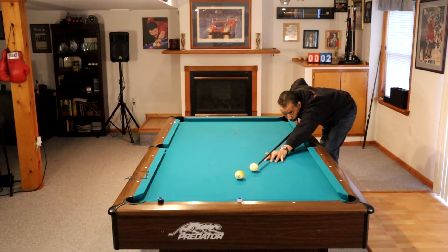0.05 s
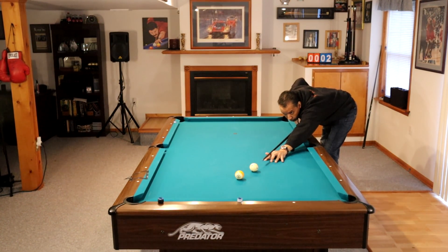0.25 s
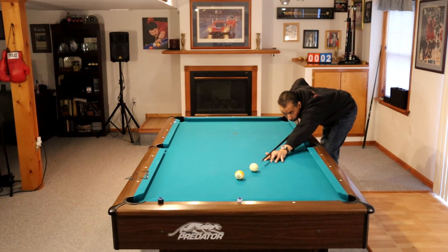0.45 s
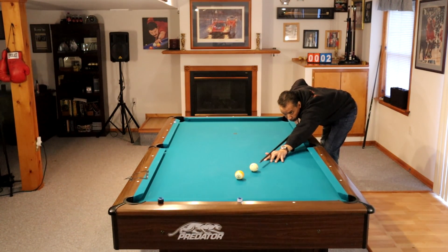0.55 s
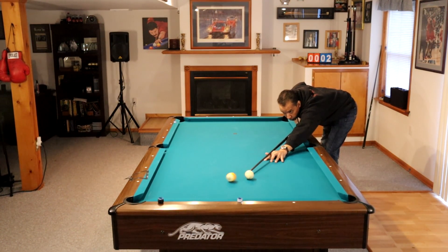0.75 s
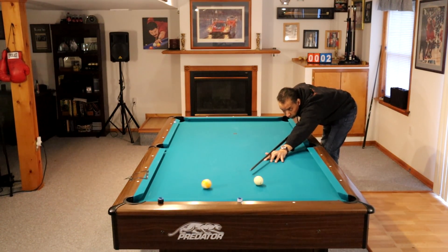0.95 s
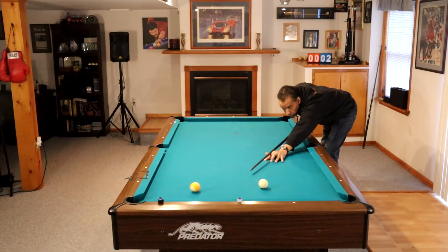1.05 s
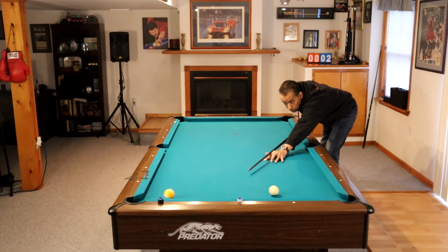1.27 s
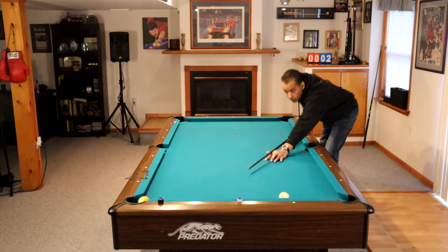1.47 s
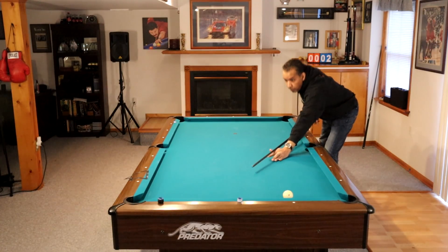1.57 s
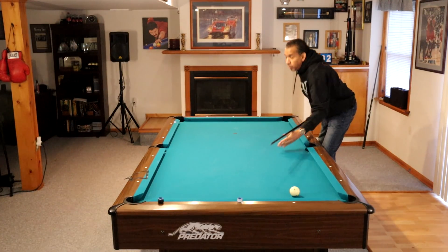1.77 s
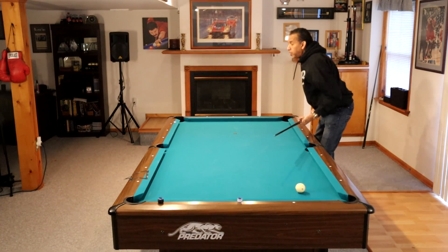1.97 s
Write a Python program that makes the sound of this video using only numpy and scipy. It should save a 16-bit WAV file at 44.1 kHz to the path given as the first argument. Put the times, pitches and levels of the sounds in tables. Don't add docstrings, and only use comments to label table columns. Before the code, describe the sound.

A pool shot in a quiet furnished room: the cue tip taps, a loud hard click of ball on ball follows, a soft roll over cloth, then a ball clatters into the pocket, heard fairly close.

```python
import sys
import numpy as np
from scipy import signal
from scipy.io import wavfile

SR = 44100
rng = np.random.default_rng(int(sys.argv[2]) if len(sys.argv) > 2 else 0)


def waveform_to_disk(signal):
    frames = np.transpose(np.atleast_2d(signal))
    scaled = np.clip(frames, -1, 1) * 32767
    samples = np.round(scaled).astype(np.int16)
    wavfile.write(sys.argv[1], SR, samples)


def makeup_ratio(level_db):
    decades = np.asarray(level_db, float) / 20
    return 10 ** decades


N = 88861

# [f/Hz, level/dB]
AIR_COLOUR = [(20, -31), (60, -17.5), (200, -13), (600, -20), (1000, -27), (2200, -34.5), (8000, -38),
              (16500, -40.5)]
AIR_DB, AIR_FLICKER_DB, AIR_FLICKER_PER_S = -62, 0.9, 8
# [f/Hz, width/Hz, rms level/dB]
HUM = [(124, 7.7, -70.5), (236.4, 4.5, -65.5), (357, 9.1, -70), (545, 19, -84.5), (602.5, 11, -70.5),
       (703, 5.2, -85.5)]
THUMP_HZ, THUMP_DB, THUMP_T60_S = 97.8, -43, 0.24
# [t/s, level/dB]
RUSTLE = [(0, -105), (.3, -90.5), (1.35, -82.5), (1.5, -66), (1.62, -60), (1.75, -55.5), (1.9, -59.5),
          (2.02, -59)]
# [f/Hz, level/dB per Hz]
RUSTLE_COLOUR = [(800, 1), (2500, 4), (6000, -2), (11000, -8.5), (16000, -13.5)]

# [t/s, level/dB]
ROLL = [(0, -80), (.8, -96), (.9, -56), (1.199, -59.5), (1.449, -63), (1.62, -55), (1.7, -67), (2.02, -78)]
# [f/Hz, level/dB per Hz]
ROLL_COLOUR = [(25, -18), (70, -3), (150, -0.5), (350, -10.5), (900, -23), (2000, -26), (5000, -59)]

# [f/Hz, level/dB, t60/s]
TABLE_MODES = [(42.82, -28, .4), (76.4, -15, 2), (115, -13, 0.62), (146, -8.5, 0.51), (177, -6.5, 0.23),
               (208, -3, 0.51), (277, -4, 0.43), (315, -5, 0.52), (396, -20.5, 0.28), (489, -14, 0.23),
               (540, -9.5, 0.12), (657, -16.5, 0.24)]
# [t/s, level/dB, tilt/dB per octave, shaking t60/s, share of free ring time]
BOOMS = [
    (0.719, -44, -7, 0.055, 0.31),
    (.806, -34.5, 13, 0.053, 0.55),
    (.822, -29, 0, 0.13, 0.83),
    (1.692, -42, -6, 0.036, 0.87),
    (1.806, -38.5, -0.5, 0.2, 0.86),
    (1.937, -40.5, -8, 0.042, 0.22),
]
BOOM_RISE_S = 0.005

# [t/s, level/dB, centre f/Hz, t60/s, room level/dB]
KNOCKS = [(.828, -28, 560, 0.065, -25.5), (1.578, -46.5, 370, 0.36, -21.5),
          (1.6723, -20.5, 586, 0.036, -18.5), (1.675, -37, 2300, 0.037, -29),
          (1.6835, -21, 1540, 0.056, -11), (1.688, -25.5, 505, 0.16, -18.5), (1.69, -32.5, 1125, 0.05, -16),
          (1.699, -22, 1303, 0.085, -21), (1.8, -34.5, 2070, 0.037, -1.5), (1.807, -27.5, 916, 0.054, -14),
          (1.811, -41, 2480, 0.029, -3.5), (1.815, -32, 1495, 0.03, -2), (1.855, -34.5, 794, 0.066, -8),
          (1.872, -36.5, 1346, 0.12, -3.5), (1.9375, -29, 1160, 0.051, -7),
          (1.938, -44.5, 3600, 0.073, -18), (1.952, -37.5, 2300, 0.1, -8), (1.943, -31.5, 280, 0.17, -26),
          (1.946, -31.5, 600, 0.088, -11.5), (1.99, -34.5, 910, 0.059, -22)]
KNOCK_RISE_S, KNOCK_TOUCHES_PER_S = 0.00086, 2500
KNOCK_OCTAVES, KNOCK_WIDTH = 0.61, 0.3
SPRAY_DB, SPRAY_T60_S, SPRAY_HZ = -33, 0.07, 6500

# [t/s, level/dB, ring f/Hz, t60/s, crack level/dB]
TICKS = [(.741, -42, 9000, 0.0066, -53), (1.2025, -63, 12480, 0.0033, -45),
         (1.3186, -62.5, 8160, 0.0074, -51.5), (1.6424, -28, 1000, 0.019, -34.5),
         (1.658, -29.5, 3740, 0.0091, -55), (1.659, -36, 5300, 0.0098, -62),
         (1.6745, -42, 5100, 0.0062, -28), (1.6806, -42, 5970, .003, -34), (1.689, -40, 6500, .003, -42),
         (1.7295, -42, 6030, .005, -60), (1.762, -40, 4000, .005, -56), (1.8004, -16, 3160, 0.0076, -37),
         (1.8078, -51, 3350, 0.0083, -45), (1.8215, -36, 6360, 0.002, -55), (1.854, -28, 3700, 0.0052, -55),
         (1.9378, -25.5, 3360, 0.0062, -33), (1.9442, -35, 7000, 0.004, -48),
         (1.944, -35, 4340, 0.0064, -58), (1.9497, -30, 3830, 0.0024, -66), (1.981, -35, 3200, 0.0054, -55),
         (2.0003, -45, 3800, 0.0034, -57)]
# [t/s, level/dB, centre f/Hz, t60/s]
SWISHES = [(1.685, -50, 15000, .06), (1.8, -46, 15000, .03), (1.955, -65, 12800, 0.12),
           (1.98, -52, 12800, 0.05), (2.004, -57, 13800, .04)]
TICK_ROOM_DB = -24

# [t/s, level/dB, ring f/Hz, ring width/Hz, room level/dB]
CLICKS = [
    (0.8033, 0.23, 1980, 2510, -14.5),
    (1.683, -7.5, 2860, 2300, -15.5),
    (1.6986, -11.5, 2640, 2330, -29),
    (1.8008, -19, 2980, 1900, -17),
    (1.8072, -18, 2740, 2330, -12),
    (1.8544, -26, 2600, 2600, -16),
]
BALL_CONTACT_S, SNAP_DB, SNAP_HZ = 0.00031, -18, 7000
POCKET_SNAP_DB, POCKET_TOP_HZ = -25, 4300

# [f/Hz, level/dB, t60/s]
SHAFT = [(525, 4, 0.026), (921, -10.5, .15), (1352, 0, 0.075), (1803, -2, 0.056), (2310, -10.5, 0.06),
         (2665, -22.5, 0.12), (3730, -19.5, 0.041), (4340, -26.5, .07), (4900, -31, .03)]
# [f/Hz, level/dB, t60/s]
SHAFT_BENDING = [(330, -11.5, 0.019), (617, -13.5, 0.12), (694.7, -6, .15), (1168, -4, .062),
                 (1654, -4.5, 0.098), (2008, -4.5, 0.11), (481.8, -17.5, 0.23)]
CUE_S, CUE_DB, CUE_CONTACT_S, CUE_ROOM_DB = 0.7199, -18, 0.00026, -21
CUE_CRACK_DB, CUE_CRACK_HZ, CUE_TOP_HZ = -27, 4000, 9200
CUE_FIZZ_DB, CUE_FIZZ_T60_S = -43.5, 0.13
CUE_CHATTER_DB = -31.5

# [delay t/s, level/dB]
ECHOES = [(.0009, -16), (.0019, -14.5), (.0043, -14), (.0075, -15), (.0185, -9), (.0215, -23.5),
          (.03, -20.5), (.0455, -21), (.047, -16.5), (.0495, -23)]
# [f/Hz, t60/s]
ROOM_T60 = [(100, 1), (500, 0.38), (2000, 0.38), (3200, 0.36), (4200, .33), (8000, .22), (16000, 0.18)]
# [f/Hz, level/dB]
ROOM_COLOUR = [(200, 14.5), (1000, 0.14), (2500, 3.5), (3900, 2), (4900, -11), (6200, -3), (8000, -9),
               (16000, -7.5)]
ROOM_RISE_S, ECHO_CUT_HZ = 0.0064, 3500
ROOM_DIP_HZ, ROOM_DIP_WIDTH_HZ = 4540, 1000

MIC_LOW_HZ, MIC_TOP_HZ, MIC_CEILING = 41, 16600, 1.08


def rms_one(x):
    return x / np.sqrt(np.mean(x ** 2) + 1e-20)


def at_hz(points, hz):
    table_hz, value = np.transpose(points)
    return np.interp(np.log(hz), np.log(table_hz), value)


def loudness(points):
    return makeup_ratio(np.interp(np.arange(N) / SR, *np.transpose(points)))


def lowpass(x, order, hz):
    return signal.sosfilt(signal.butter(order, hz, fs=SR, output="sos"), x)


def ring(x, hz, t60):
    r = makeup_ratio(-60 / (t60 * SR))
    w = 2 * np.pi * hz / SR
    return signal.lfilter([0, np.sin(w)], [1, -2 * r * np.cos(w), r * r], x + 1e-18)


def resonance(x, hz, width_hz):
    r = np.exp(-np.pi * width_hz / SR)
    rising = np.array([1, 0, -1]) * (1 - r * r) / 2
    return signal.lfilter(rising, [1, -2 * r * np.cos(2 * np.pi * hz / SR), r * r], x)


def add(out, s, x):
    i = int(s * SR)
    out[i:i + len(x)] += x[:N - i]


def contact(length_s, size):
    u = np.minimum(np.arange(size) / SR / length_s, 1)
    bump = np.abs(np.sin(np.pi * u)) ** 1.5
    return bump / bump.sum()


def dying(rise_s, t60, size):
    t = np.arange(size) / SR
    return (1 - np.exp(-t / rise_s)) * makeup_ratio(-60 * t / t60)


def crack(t60, hz):
    return resonance(rng.standard_normal(6000), hz, hz) * dying(0.00015, t60, size=6000)


def bands(colour, gain, size):
    settle = 4000
    edges = 22 * 2 ** (np.arange(30) / 3)
    white = rng.standard_normal((2, size + settle))
    out = np.zeros(size)
    for k, (lo, hi) in enumerate(zip(edges, edges[1:])):
        centre = np.sqrt(lo * hi)
        band_filter = signal.butter(2, [lo, hi], "band", fs=SR, output="sos")
        band = signal.sosfilt(band_filter, white[k % 2])[settle:]
        out += makeup_ratio(at_hz(colour, centre)) * gain(centre) * band
    return out


def drift(rate):
    points = rng.standard_normal(400)
    return np.interp(np.arange(N) / SR * rate, np.arange(400), points)


def background():
    air = rms_one(bands(AIR_COLOUR, lambda hz: makeup_ratio(AIR_FLICKER_DB * drift(AIR_FLICKER_PER_S)), size=N))
    hum = np.zeros(N)
    for hz, width_hz, db in HUM:
        line = resonance(rng.standard_normal(2 * N), hz, width_hz)
        line = resonance(line, hz, 4.2 * width_hz)[N:]
        hum += makeup_ratio(db) * rms_one(line)
    tone = np.sin(2 * np.pi * THUMP_HZ * np.arange(N) / SR)
    thump = makeup_ratio(THUMP_DB) * tone * dying(0.017, THUMP_T60_S, size=N)
    cloth = rms_one(bands([(300, -41)] + RUSTLE_COLOUR, lambda hz: makeup_ratio(2.2 * drift(20)), size=N))
    return makeup_ratio(AIR_DB) * air + hum + thump + loudness(RUSTLE) * cloth


def rolling():
    rumble = rms_one(bands(ROLL_COLOUR, lambda hz: makeup_ratio(0.99 * drift(20)), size=N))
    return loudness(ROLL) * rumble


def table():
    out = np.zeros(N)
    for s, db, tilt_db, shake_t60, share in BOOMS:
        shakes = rng.standard_normal((len(TABLE_MODES), SR)) * dying(BOOM_RISE_S, shake_t60, size=SR)
        boom = np.zeros(SR)
        for (hz, level_db, t60), shake in zip(TABLE_MODES, shakes):
            mode = ring(shake, hz, share * t60)
            boom += makeup_ratio(level_db + tilt_db * np.log2(hz / 250)) * mode / np.abs(mode).max()
        add(out, s, makeup_ratio(db) * boom)
    return out


def knocks():
    near, send = np.zeros(N), np.zeros(N)
    size = SR // 4
    for s, db, hz, t60, room_db in KNOCKS:
        touched = rng.random(size) < KNOCK_TOUCHES_PER_S / SR
        touches = rng.standard_normal(size) * touched * dying(KNOCK_RISE_S, t60, size=size)
        touches[40] = 1
        x = np.zeros(size)
        for k, offset in enumerate(np.arange(-3, 4) / 3):
            mode_hz = hz * 2 ** (KNOCK_OCTAVES * offset)
            x += resonance(np.roll(touches, 9 * k) + 1e-18, mode_hz, KNOCK_WIDTH * mode_hz / 2 ** (KNOCK_OCTAVES * offset))
        x = resonance(x, hz, 0.9 * hz)
        x = makeup_ratio(db) * x / np.abs(x).max()
        add(near, s, x)
        add(near, s, makeup_ratio(db + SPRAY_DB) * crack(SPRAY_T60_S, SPRAY_HZ))
        add(send, s, x * makeup_ratio(room_db))
    return near, send


def ticks():
    out = np.zeros(N)
    for s, db, hz, t60, crack_db in TICKS:
        tick = ring(contact(0.0001, size=2000), hz, t60)
        add(out, s, makeup_ratio(db) * resonance(tick, hz, 0.5 * hz))
        add(out, s, makeup_ratio(crack_db) * crack(0.006, 5000))
    for s, db, hz, t60 in SWISHES:
        swish = rms_one(resonance(rng.standard_normal(6000), hz, 0.13 * hz))
        add(out, s, makeup_ratio(db) * swish * dying(0.005, t60, size=6000))
    return out


def clicks():
    near, send = np.zeros(N), np.zeros(N)
    push = contact(BALL_CONTACT_S, size=600)
    snap = resonance(contact(0.00007, size=600), SNAP_HZ, 4200)
    snap = snap / np.abs(snap).max()
    for s, db, hz, width_hz, room_db in CLICKS:
        in_pocket = s > 1
        body = resonance(resonance(push, hz, width_hz), 0.15 * hz, width_hz)
        if in_pocket:
            body = lowpass(body, 2, POCKET_TOP_HZ)
        snap_db = POCKET_SNAP_DB if in_pocket else SNAP_DB
        x = makeup_ratio(db) * (body / np.abs(body).max() + makeup_ratio(snap_db) * snap)
        add(near, s, x)
        add(send, s, x * makeup_ratio(room_db))
    return near, send


def cue():
    out = np.zeros(N)
    size = SR // 2
    push = contact(CUE_CONTACT_S, size=size)
    jolt = np.diff(push, prepend=0) * SR / 2 / np.pi
    along = sum(makeup_ratio(db) * ring(jolt / hz, hz, t60) for hz, db, t60 in SHAFT)
    chatter = rng.standard_normal((len(SHAFT_BENDING), size)) * dying(0.001, 0.064, size=size) / 5
    chatter = makeup_ratio(CUE_CHATTER_DB) * chatter
    bending = np.zeros(size)
    for k, (hz, db, t60) in enumerate(SHAFT_BENDING):
        bending += makeup_ratio(db) * ring(chatter[k] + push * (-1) ** k, hz, t60)
    add(out, CUE_S, makeup_ratio(CUE_DB) * along)
    add(out, CUE_S - 0.0004, makeup_ratio(CUE_DB) * bending)
    tip = makeup_ratio(CUE_CRACK_DB) * crack(0.012, CUE_CRACK_HZ) + makeup_ratio(CUE_FIZZ_DB) * crack(CUE_FIZZ_T60_S, 6000)
    add(out, CUE_S, lowpass(tip, 3, CUE_TOP_HZ))
    return out, out * makeup_ratio(CUE_ROOM_DB)


def room(near, send):
    size = SR // 2
    tail = bands(ROOM_COLOUR, lambda hz: dying(ROOM_RISE_S, at_hz(ROOM_T60, hz), size=size), size=size)
    tail = tail / np.sqrt(np.sum(tail ** 2)) * makeup_ratio(8.0)
    out = signal.fftconvolve(send, tail)[:N]
    mid_table = near * (np.arange(N) < SR)
    dull = lowpass(mid_table, 5, ECHO_CUT_HZ)
    for k, (s, db) in enumerate(ECHOES):
        echo = resonance(dull, rng.uniform(1700, 2300), 3000)
        add(out, s, makeup_ratio(db) * (-1) ** k * echo)
    return out - 0.9 * resonance(out, ROOM_DIP_HZ, ROOM_DIP_WIDTH_HZ)


def scene():
    knock, knock_send = knocks()
    tick = ticks()
    ball, ball_send = clicks()
    stick, stick_send = cue()
    send = stick_send + ball_send + knock_send + makeup_ratio(TICK_ROOM_DB) * tick
    wet = room(ball, send)
    mix = background() + rolling() + table() + knock + tick + ball + stick + wet
    return mix[None]


def low_pass(x):
    return signal.sosfilt(signal.butter(12, 16820, fs=SR, output="sos"), x)


def record(dry):
    x = signal.sosfilt(signal.butter(2, MIC_LOW_HZ, "high", fs=SR, output="sos"), dry)
    x = x / (1 + np.abs(x / MIC_CEILING) ** 8) ** (1 / 8)
    x = signal.sosfilt(signal.cheby2(10, 60, MIC_TOP_HZ + 400, fs=SR, output="sos"), x)
    return low_pass(x)


dry = scene()
out = record(dry)
waveform_to_disk(out)
```